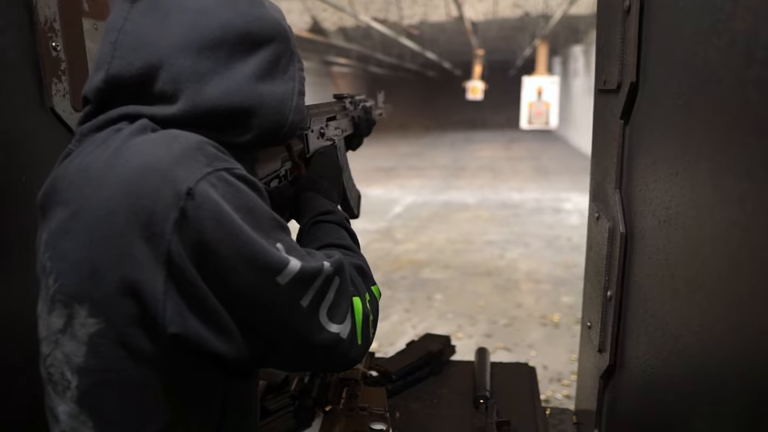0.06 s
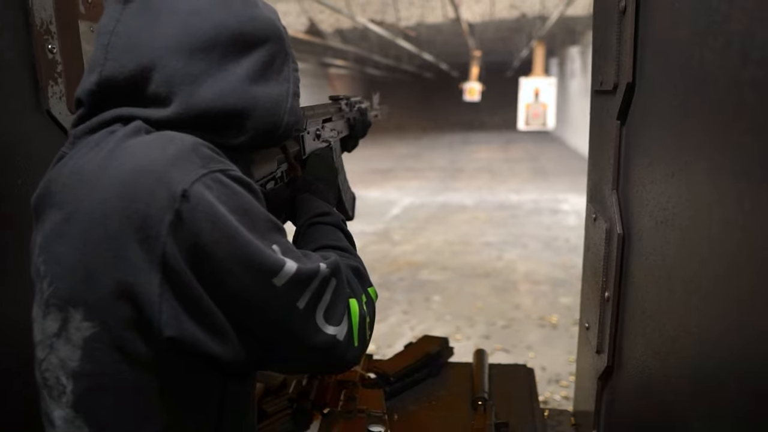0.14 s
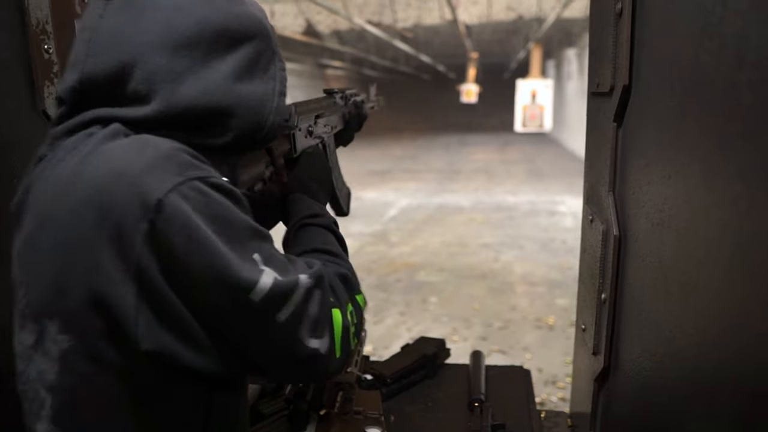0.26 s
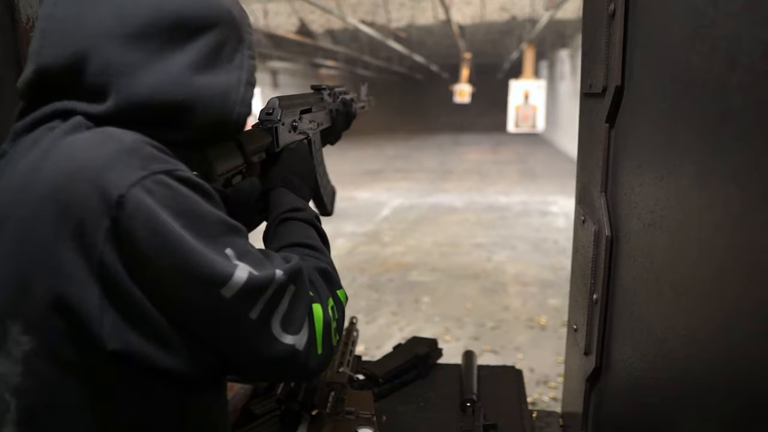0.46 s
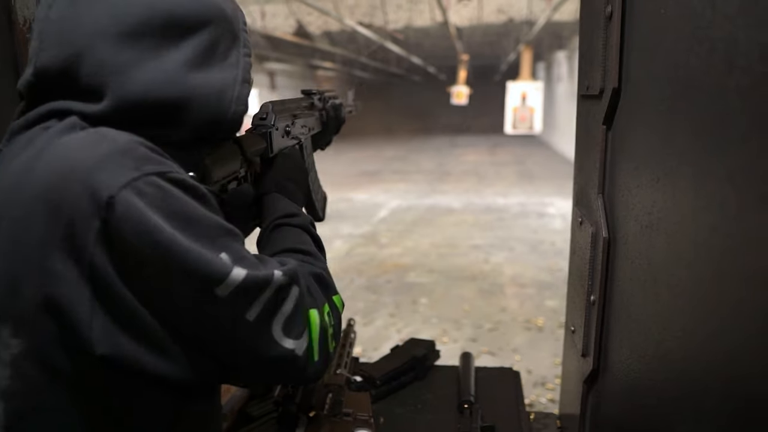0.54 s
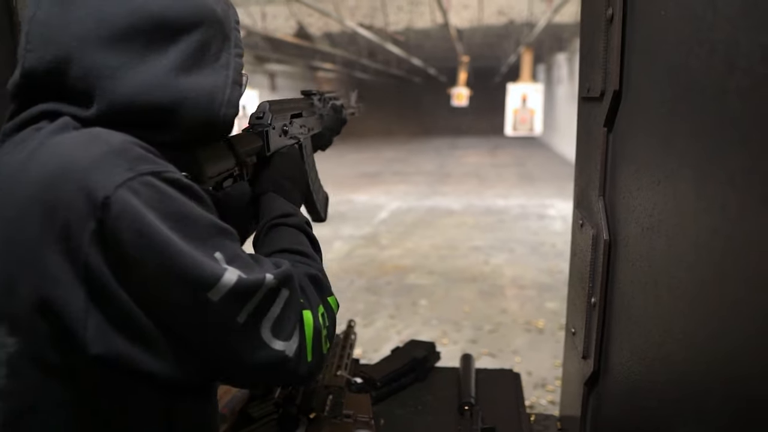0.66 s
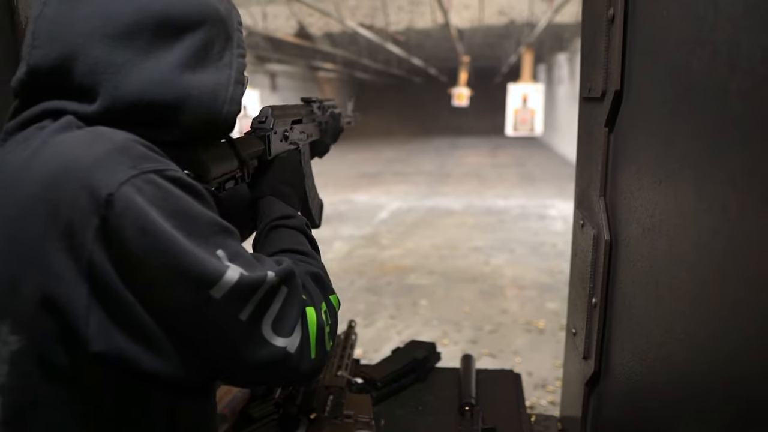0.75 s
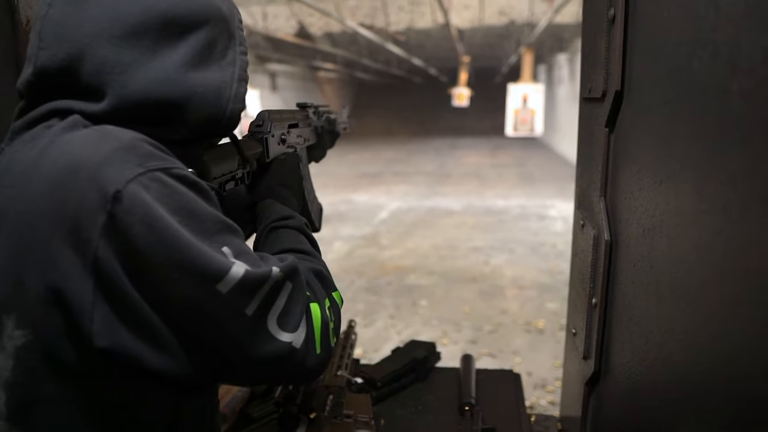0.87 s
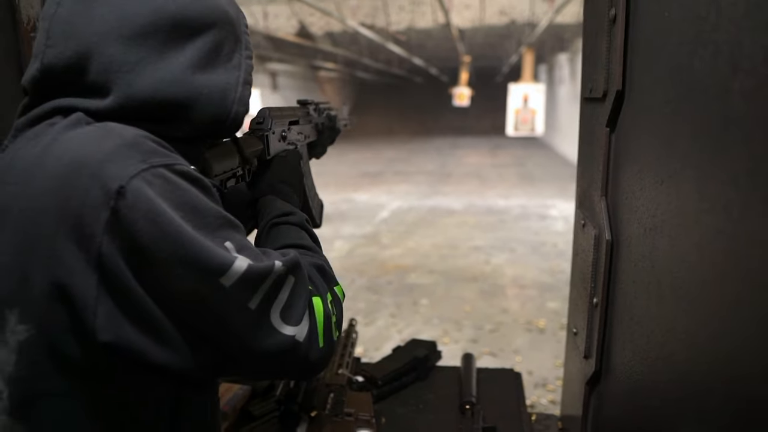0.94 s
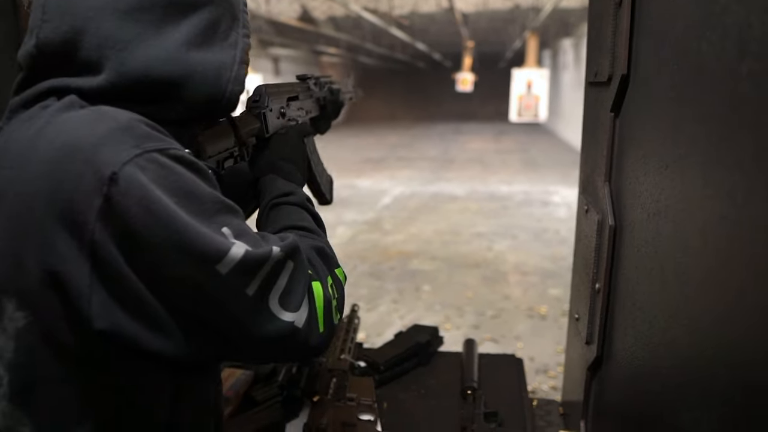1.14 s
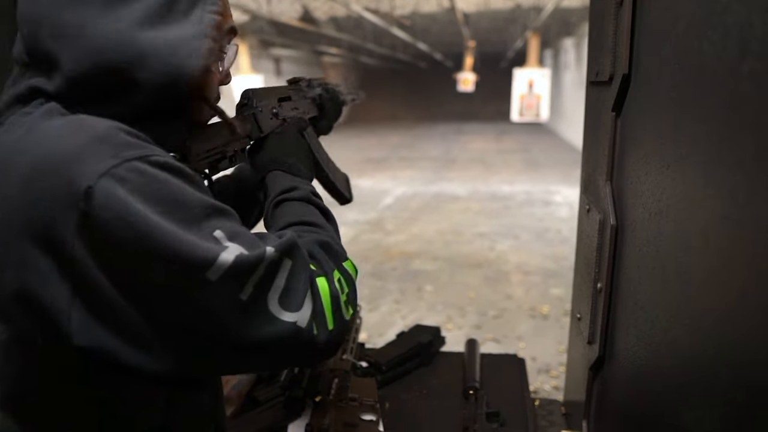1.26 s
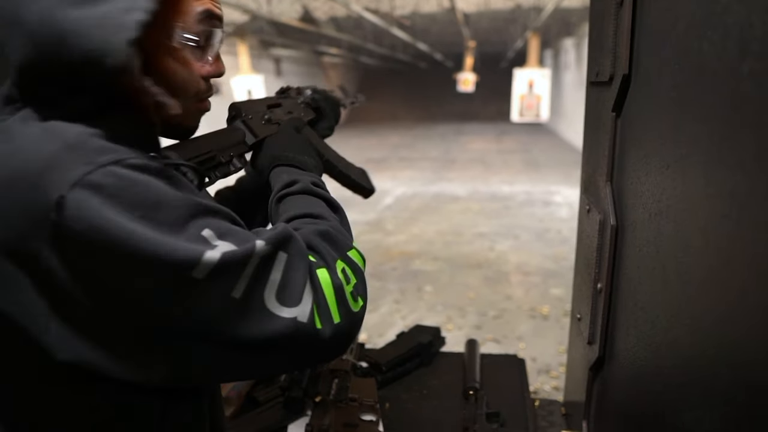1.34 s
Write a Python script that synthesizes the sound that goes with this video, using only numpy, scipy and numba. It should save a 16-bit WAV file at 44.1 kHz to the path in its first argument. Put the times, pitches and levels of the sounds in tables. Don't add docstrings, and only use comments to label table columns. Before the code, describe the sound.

Rifle fires three quick loud blasts indoors, with hard panel slaps and a long ringing echo

```python
import sys
import numpy as np
from scipy import signal
from scipy.fft import rfft, irfft
from scipy.io import wavfile
from scipy.ndimage import uniform_filter1d
from numba import njit

SR = 44100
rng = np.random.default_rng(int(sys.argv[2]) if len(sys.argv) > 2 else 0)


def volts_from_db(level):
    exponent = np.asarray(level, float) / 20
    return 10 ** exponent


def waveform_to_disk(signal):
    frames = np.transpose(np.atleast_2d(signal))
    scaled = np.clip(frames, -1, 1) * 32767
    samples = np.round(scaled).astype(np.int16)
    wavfile.write(sys.argv[1], SR, samples)


N = 61739

LEFT_RIGHT = np.array([[1], [-1]])


def table(rows, hz):
    rows = np.array(rows, float)
    return np.interp(np.log(hz), np.log(rows[:, 0]), rows[:, 1])


def band(hz, octaves):
    size = 131072
    bins_hz = np.maximum(np.arange(size // 2 + 1) * SR / size, 1)
    offset = np.log2(bins_hz / hz) / octaves
    bell = np.cos(np.clip(offset, -1, 1) * np.pi / 2)
    noise = irfft(rfft(rng.standard_normal(size)) * bell)
    return noise / noise.std()


def decay(t, t60):
    return (t >= 0) * np.exp(-np.log(1000) * np.maximum(t, 0) / t60)


# frequency in Hz, side level against mid in dB.
SIDE_WIDTH = [(60, -23), (110, -30), (200, -62), (380, -15.5), (700, -5), (1290, -4), (2380, -4),
              (4400, 1.5), (8120, 2.5), (15000, -1)]
# centre in Hz, bandwidth in Hz, level in dB.
DUCT_BANDS = [(271, 48.6, -42), (155, 360, -57.5), (70, 52, -55), (860, 1000, -50), (2410, 2500, -55.5)]


def duct():
    out = np.zeros((2, N))
    for hz, width_hz, db in DUCT_BANDS:
        octaves = np.log2(1 + width_hz / hz)
        mid, side = band(hz, octaves)[:N], band(hz, octaves)[:N]
        out += volts_from_db(db) * (mid + volts_from_db(table(SIDE_WIDTH, hz)) * side * LEFT_RIGHT)
    return out


# frequency in Hz, level in dB, 60 dB decay time in seconds.
MOUTH_MODES = [(12250, -7, .35), (12400, -2, .35), (12560, 0, .4), (12700, -1, .5), (12890, -3, .5),
               (13050, -9, .2)]
FLANK_MODES = [(9150, -14, .3), (9615, -12, .17), (10100, 0, .5), (10280, -3, .6)]
BASE_MODES = [(10900, 0, .45), (11320, 0, .06), (15330, -1, .28), (15200, -10, .2)]
# start in seconds, mouth level in dB, flank level in dB, base level in dB, tick level in dB.
CASE_HITS = [
    (-.03, -66, -79, -76, -92),
    (.0383, -59, -80, -90, -70),
    (.085, -75, -83, -90, -93),
    (.1815, -58, -67, -87, -58),
    (1.0192, -56, -85, -90, -70),
    (1.082, -62, -85, -90, -74),
    (1.1683, -63, -78, -59, -50),
    (1.1883, -53.5, -54, -90, -57),
    (1.2506, -61, -68, -90, -74),
]


def cases(t):
    rattle_db, rattle_hz, rise_s = 4, 60, 0.0027
    parts_roughness = (1, .6, .25)
    out = np.zeros((2, N))
    for start, mouth_db, flank_db, base_db, tick_db in CASE_HITS:
        age = t - start
        part_modes = (MOUTH_MODES, FLANK_MODES, BASE_MODES)
        for modes, db, rough in zip(part_modes, (mouth_db, flank_db, base_db), parts_roughness):
            rattle = volts_from_db(rattle_db * rough * band(rattle_hz, 1.5)[:N])
            for hz, mode_db, t60 in modes:
                phase = rng.uniform(0, 2 * np.pi, (2, 1))
                detune, luck_db = rng.standard_normal(2) * [1 / 500, 2.0]
                ring = np.sin(2 * np.pi * hz * (1 + detune) * t + phase) * rattle
                out += volts_from_db(db + mode_db + luck_db) * ring * decay(age, t60) * np.clip(age / rise_s, 0, 1)
        tick = np.array([band(10500, .8)[:N], band(10500, .8)[:N]])
        out += volts_from_db(tick_db) * decay(age, .035) * tick
    return out


# delay in seconds, frequency in Hz, level in dB, 60 dB decay time in seconds.
PANEL_SLAPS = [(0.00097, 4600, -19, .03), (.012, 1190, 2.5, .1), (.016, 2100, 0.5, 0.037),
               (.036, 1240, -1, 0.11), (0.029, 390, -0.5, .08), (.058, 400, -4, 0.091),
               (.07, 880, -2.5, 0.068), (.04, 680, -3, 0.064), (.095, 350, -6.5, 0.082),
               (.118, 400, -5.5, 0.078), (.138, 430, -2.5, 0.071), (.024, 420, -12, .5)]


def slaps(t):
    slap_db, side_db, rise_s = -2, -13.5, 0.0043
    partials = ((1, 1), (.9, 0.49), (1.12, 0.61))
    out = np.zeros((2, N))
    for delay, hz, db, t60 in PANEL_SLAPS:
        phase, side = rng.uniform(0, 2 * np.pi), band(hz, 0.62)
        for start, shot_db, *_ in SHOT_EVENTS:
            age = t - start - delay
            ring = sum(np.sin(2 * np.pi * hz * k * age + phase * k) * gain for k, gain in partials)
            since = np.maximum(np.arange(N) - round((start + delay) * SR), 0)
            wide = volts_from_db(side_db) * side[since] * LEFT_RIGHT
            shape = decay(age, t60) * np.clip(age / rise_s, 0, 1)
            out += volts_from_db(slap_db + db + shot_db) * (ring + wide) * shape
    return out


# frequency in Hz, level in dB per Hz.
HALL_COLOUR = [(60, -14.5), (170, -8), (400, -4.5), (600, -7.5), (1300, -10), (3000, -10), (4600, -15.5),
               (15500, -31.5)]
# frequency in Hz, 60 dB decay time in seconds.
HALL_T60 = [(80, 2.02), (250, 1.934), (1000, 1.62), (3000, 1.565), (4600, 1.25), (7000, 1.04),
            (10000, 0.92), (15000, 0.88)]
# frequency in Hz, 60 dB decay time in seconds.
BOOTH_DECAY = [(100, 0.28), (1000, 0.45), (5000, 0.13), (14000, 0.45)]
# frequency in Hz, level in dB per Hz.
CRACK_COLOUR = [(1470, -28), (2500, -26), (4780, 4), (8160, -16), (9370, -5), (10700, 5.5), (15500, 1)]
# start in seconds, level in dB, crack level in dB, treble lift in dB,
# share (0 to 1) of the phone's bass cut-out.
SHOT_EVENTS = [
    (-.62, -11.5, 0, -7.5, 1),
    (.2272, -9.5, -7.5, -2.5, 0.85),
    (.3936, -8, -5.5, 2.5, .7),
    (.5552, -7, 2.5, 1.5, 0.59),
]


def shots(t):
    tail_db, booth_db, crack_db = -8, -8, -25.5
    crack_t60_s, rise_s = 0.12, 0.00072
    same_below_hz = 1630
    treble_hz, fade_hz, fade_db_s2 = 6500, 10500, 30
    out = np.zeros((2, N))
    for hz in 45 * 2 ** np.arange(0, 8.6, .5):
        hall = [band(hz, .5), band(hz, .5)]
        share = 1 / (1 + (hz / same_below_hz) ** 4)
        for start, db, shot_crack_db, treble_db, _ in SHOT_EVENTS:
            age = t - start
            since = np.maximum(np.arange(N) - round(start * SR), 0)
            answers = []
            for noise in hall:
                own = np.roll(noise, rng.integers(5000, 120000))
                answers.append(np.sqrt(share) * noise[since] + np.sqrt(1 - share) * own[since])
            mid, side = answers
            tail = volts_from_db(tail_db) * decay(age, table(HALL_T60, hz))
            booth = volts_from_db(booth_db) * decay(age, table(BOOTH_DECAY, hz))
            roar = volts_from_db(table(HALL_COLOUR, hz)) * (tail + booth)
            crack = volts_from_db(table(CRACK_COLOUR, hz) + crack_db + shot_crack_db) * decay(age, crack_t60_s)
            shape = (roar + crack) * np.clip(age / rise_s, 0, 1) * volts_from_db(db) * np.sqrt(hz / 1000)
            shape *= volts_from_db(treble_db / (1 + (treble_hz / hz) ** 4))
            shape *= volts_from_db(-fade_db_s2 * age ** 2 / (1 + (fade_hz / hz) ** 6))
            out += shape * (mid + volts_from_db(table(SIDE_WIDTH, hz)) * side * LEFT_RIGHT)
    return out


def scene():
    t = np.arange(N) / SR
    left_db = 0.1
    return (duct() + cases(t) + slaps(t) + shots(t)) * volts_from_db(left_db * LEFT_RIGHT)


@njit
def lowcut(x, hz, k):
    y, b, l = np.empty(len(x)), 0., 0.
    for i in range(len(x)):
        g = np.tan(np.pi * hz[i] / SR)
        v = (b + g * (x[i] - l)) / (1 + g * (g + k))
        low = l + g * v
        b, l, y[i] = 2 * v - b, 2 * low - l, x[i] - k * v - low
    return y


@njit
def follow(x, up, down):
    y, e = np.empty(len(x)), 0.
    for i in range(len(x)):
        e += (x[i] - e) * (up if x[i] > e else down)
        y[i] = e
    return y


def thin_bass(x, t):
    rest_hz, damping, leak_db = 109.4, 1.168, -15
    fast_hz, fast_s, slow_hz, slow_s = 2780, 0.0091, 248, 0.03
    jump = np.zeros(N)
    for start, *_, cut in SHOT_EVENTS:
        jump += cut * fast_hz * decay(t - start, fast_s * np.log(1000))
        jump += slow_hz * decay(t - start, slow_s * np.log(1000))
    hz = rest_hz + np.minimum(jump, 9000)
    return np.array([lowcut(lowcut(c, hz, damping), hz, damping) + volts_from_db(leak_db) * c for c in x])


def limiter(x):
    threshold_db, ratio = -10, 2.82
    attack_s, release_s, smooth_s = 0.00033, 0.068, .0015
    level = follow(np.abs(x).max(axis=0), 1 / (attack_s * SR + 1), 1 / (release_s * SR))
    for _ in range(2):
        level = uniform_filter1d(level, int(smooth_s * SR) + 1)
    return x * np.minimum(volts_from_db(threshold_db) / (level + 1e-9), 1) ** (1 - 1 / ratio)


def roll_off(x):
    return signal.sosfilt(signal.butter(12, 16980, fs=SR, output="sos"), x)


def record(dry):
    t = np.arange(N) / SR
    clip, top_hz, bottom_hz = .7, 15800, 85
    x = limiter(thin_bass(dry, t))
    x = clip * np.tanh(x / clip)
    x = signal.sosfilt(signal.ellip(8, .2, 70, top_hz, fs=SR, output="sos"), x)
    x = signal.sosfilt(signal.butter(3, bottom_hz, "high", fs=SR, output="sos"), x)
    return roll_off(x)


dry = scene()
out = record(dry)
waveform_to_disk(out)
```